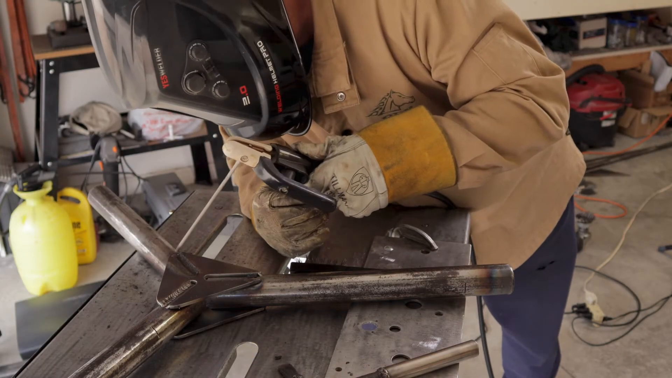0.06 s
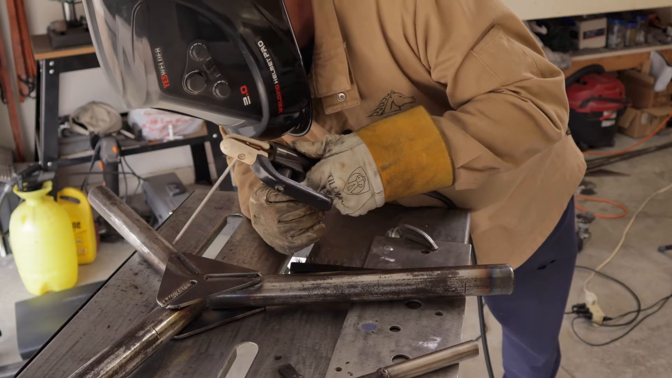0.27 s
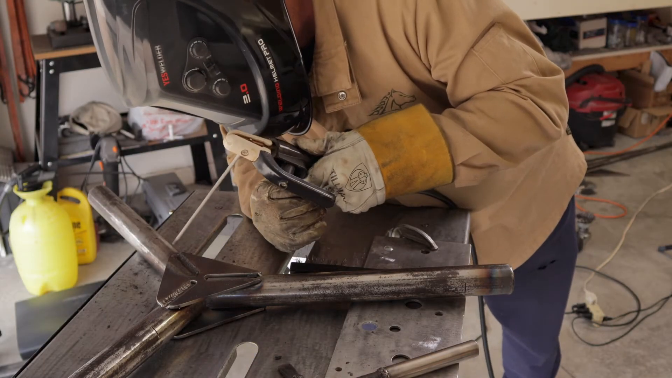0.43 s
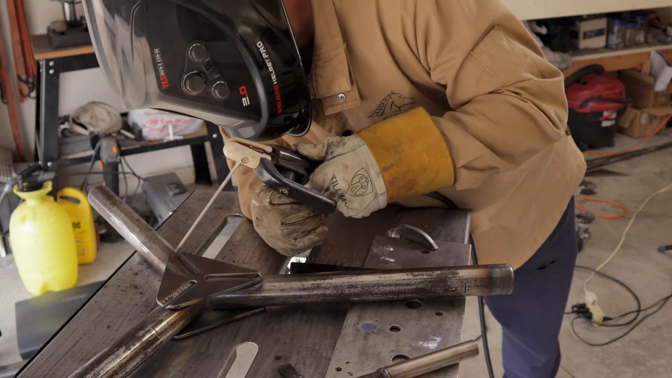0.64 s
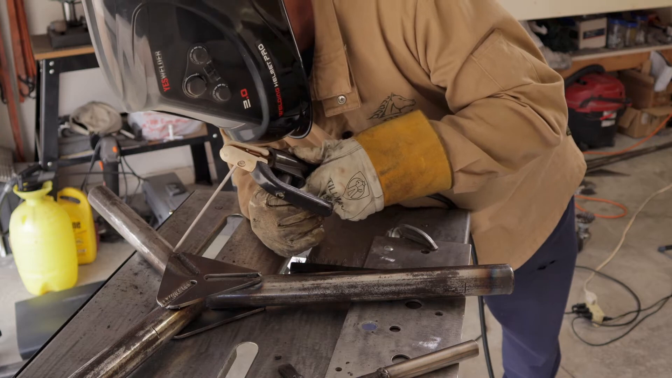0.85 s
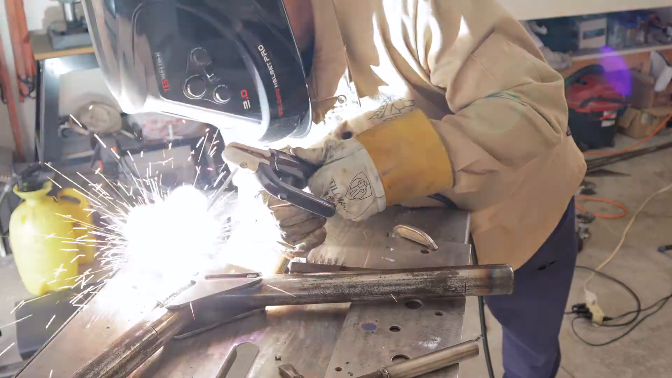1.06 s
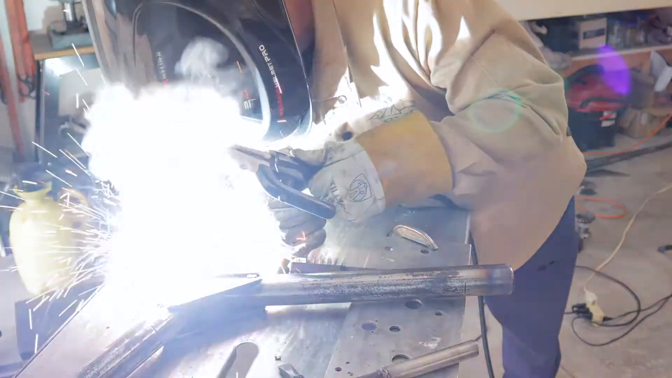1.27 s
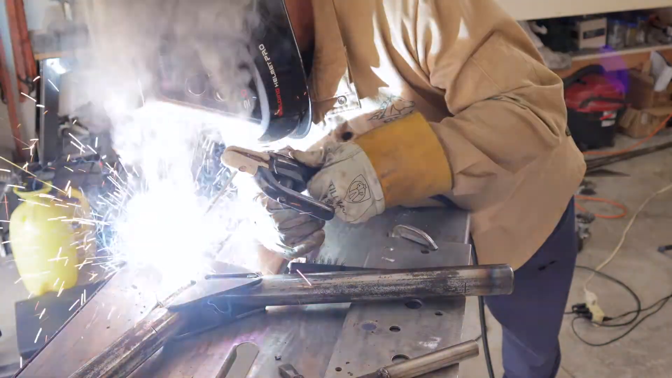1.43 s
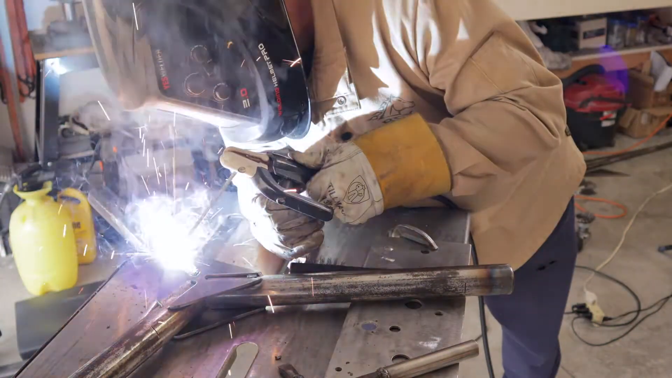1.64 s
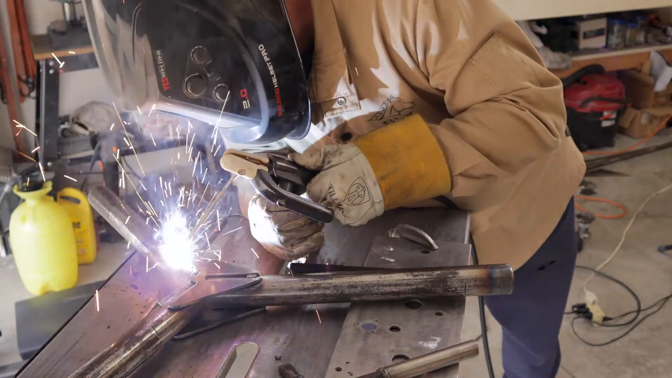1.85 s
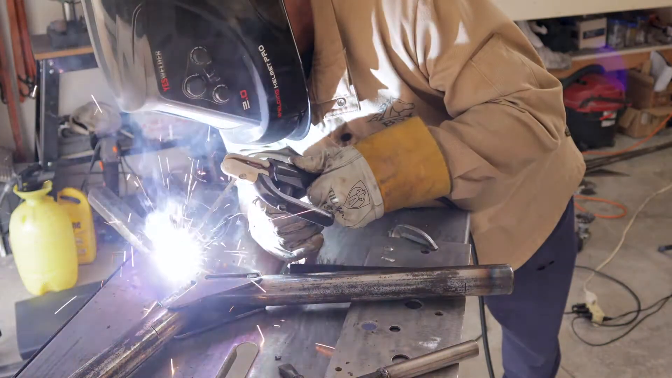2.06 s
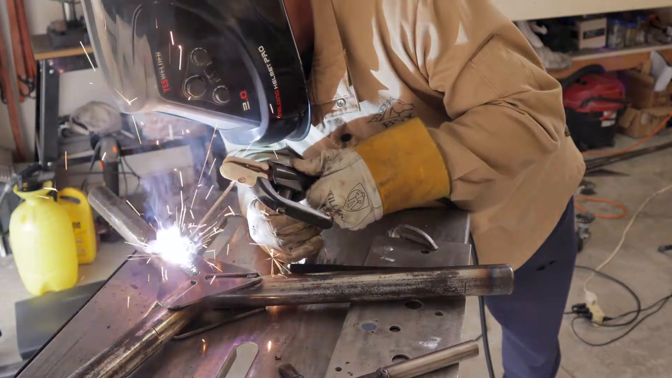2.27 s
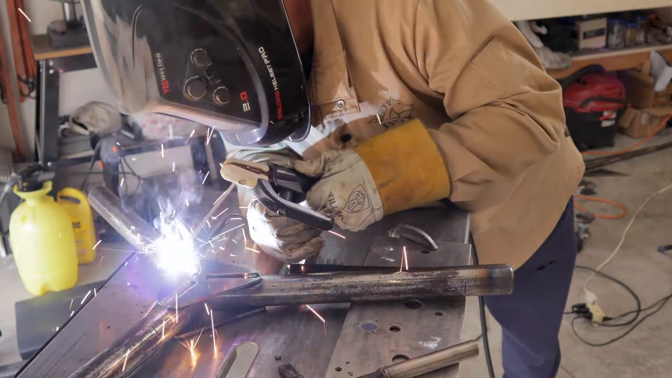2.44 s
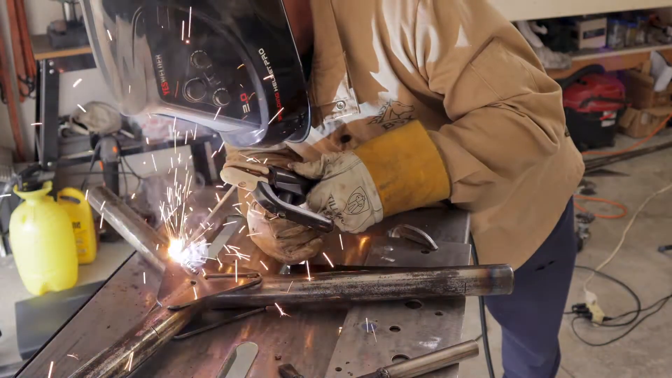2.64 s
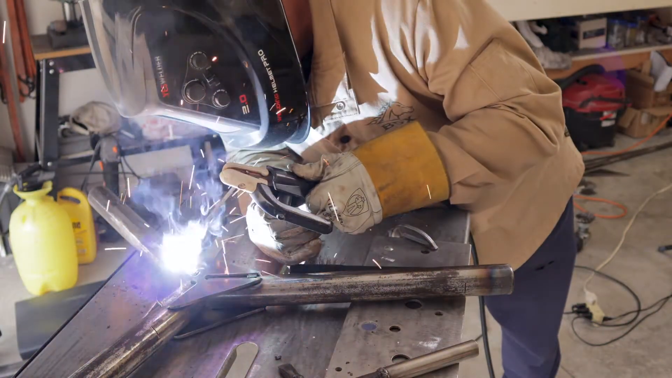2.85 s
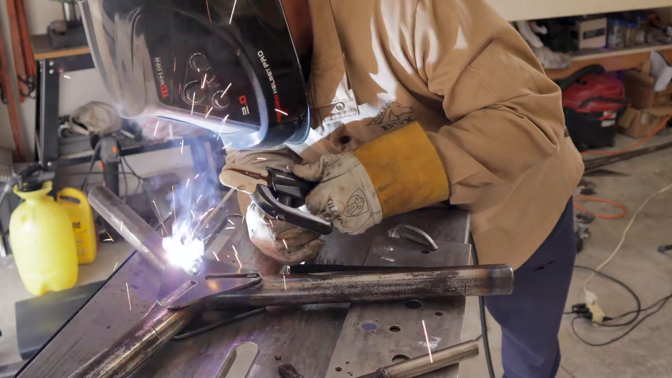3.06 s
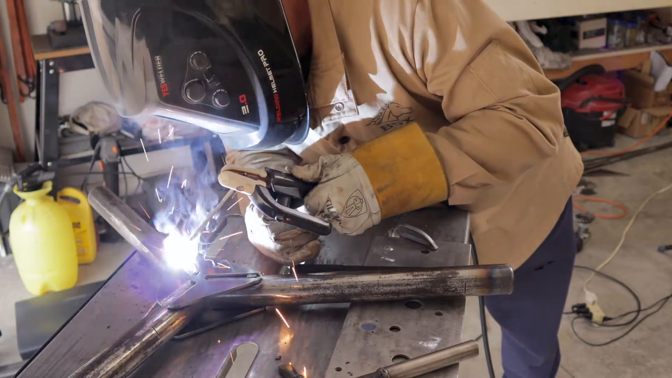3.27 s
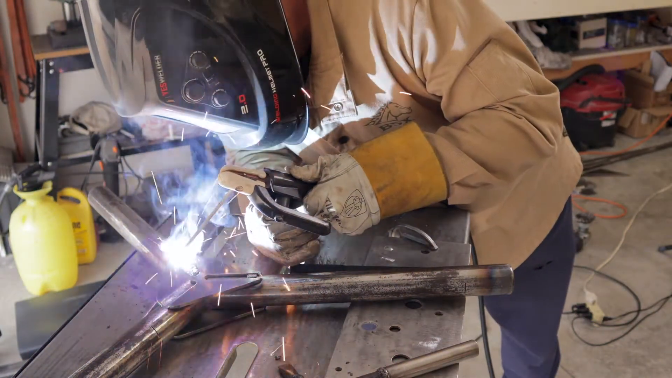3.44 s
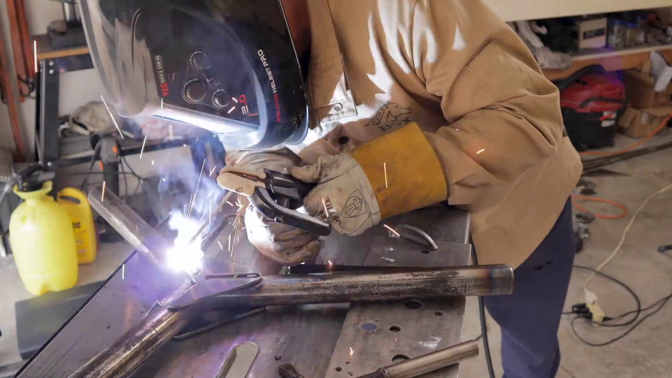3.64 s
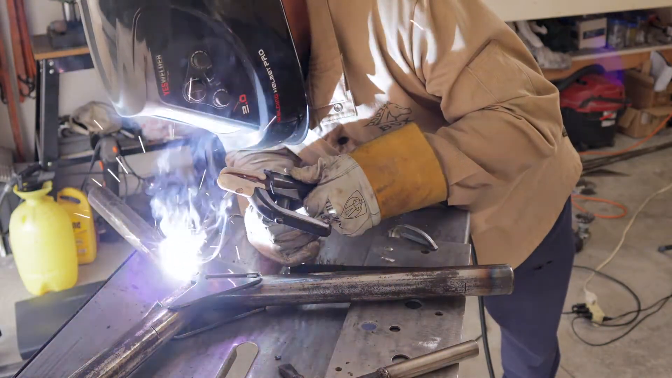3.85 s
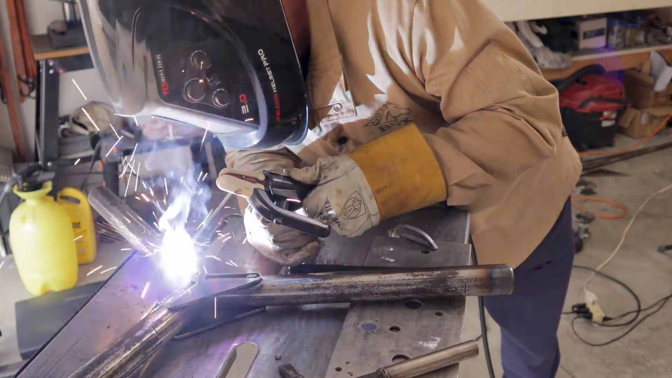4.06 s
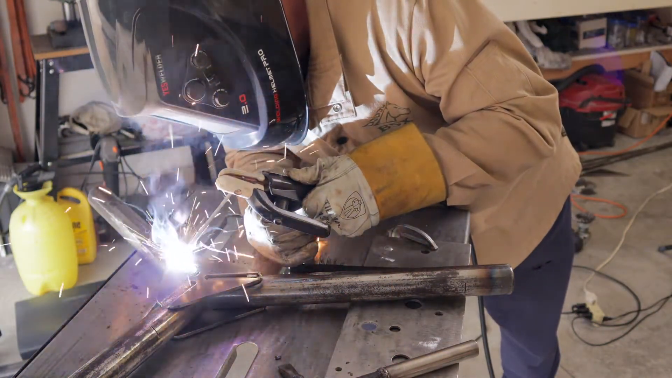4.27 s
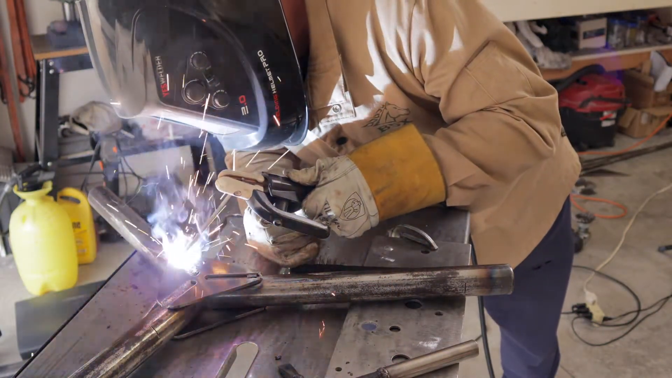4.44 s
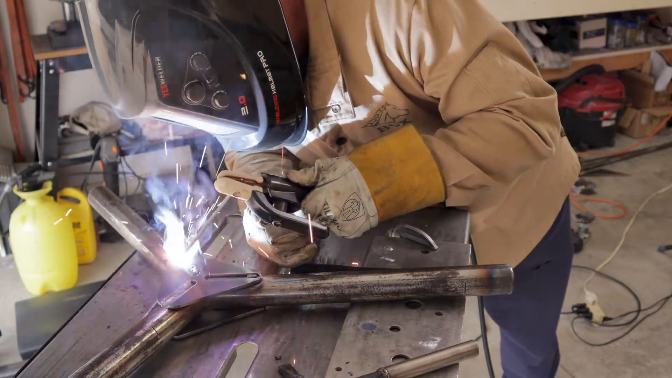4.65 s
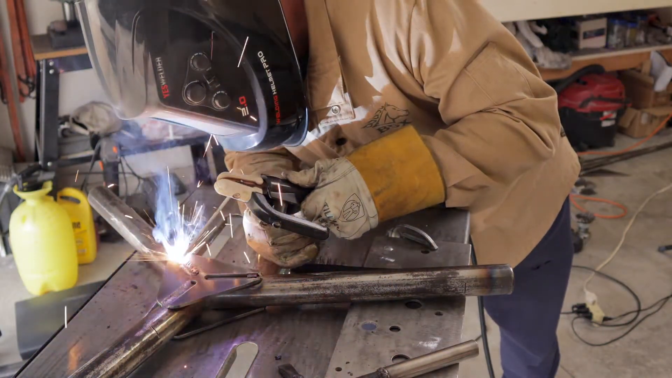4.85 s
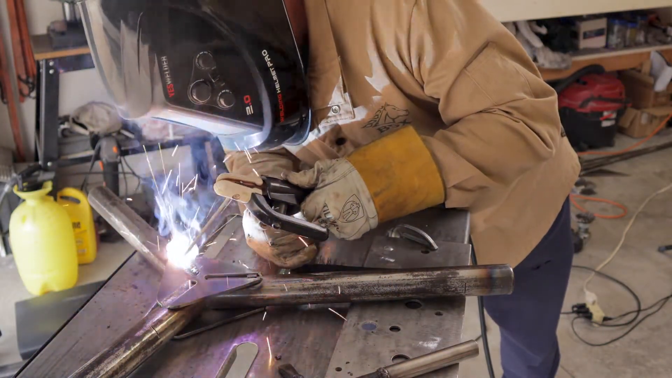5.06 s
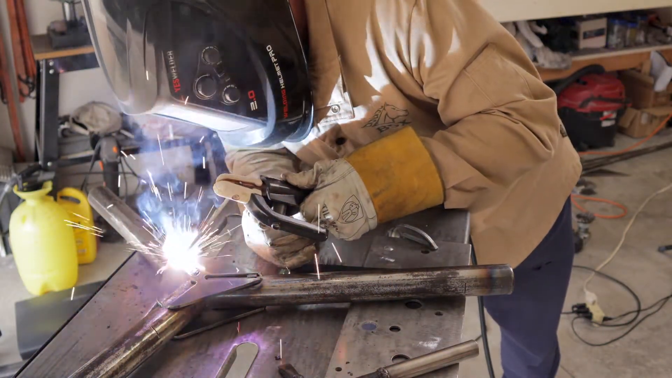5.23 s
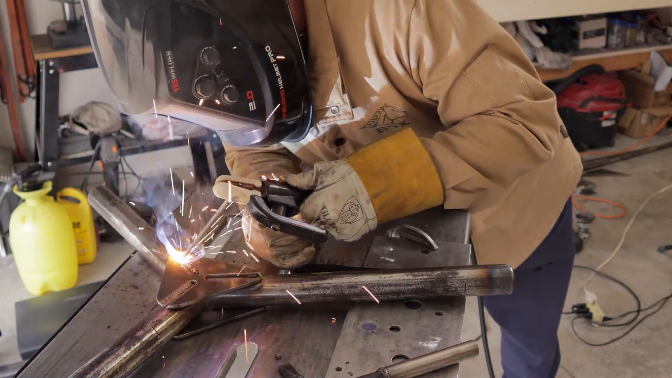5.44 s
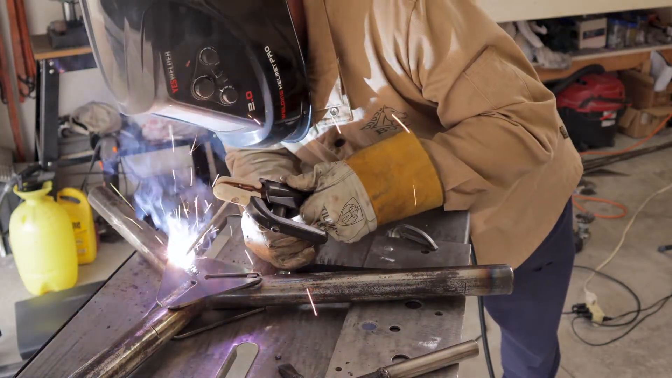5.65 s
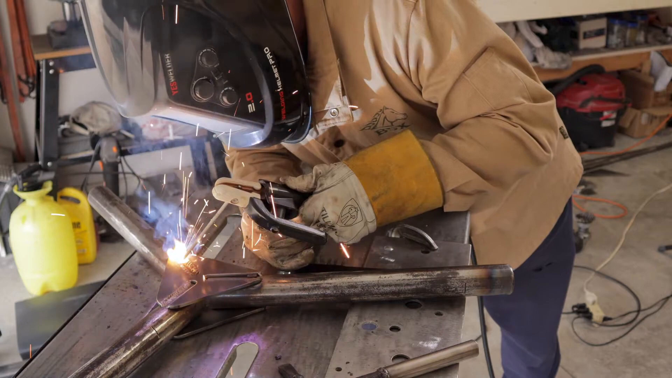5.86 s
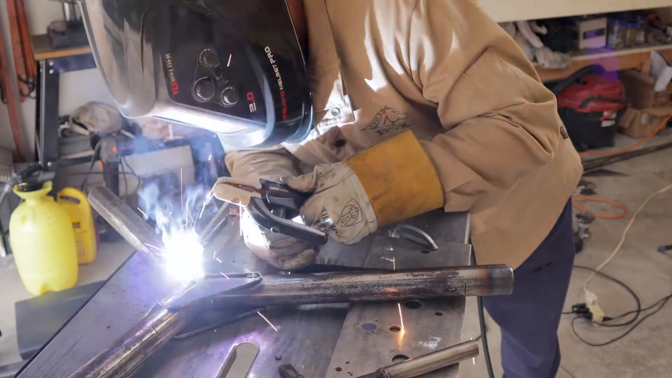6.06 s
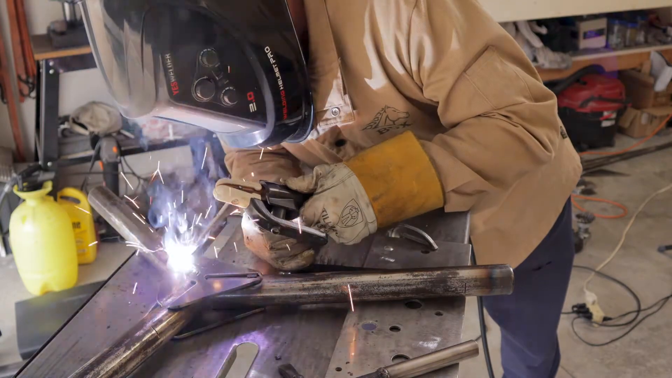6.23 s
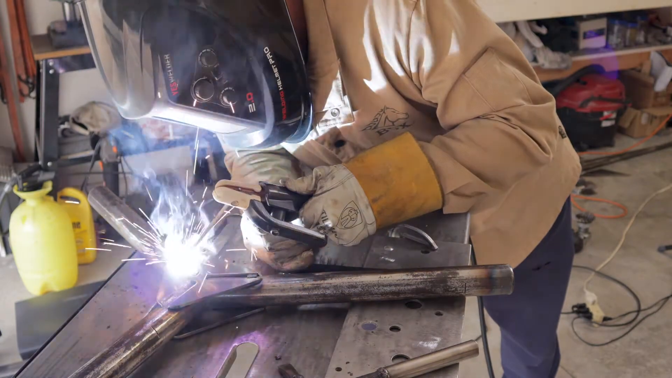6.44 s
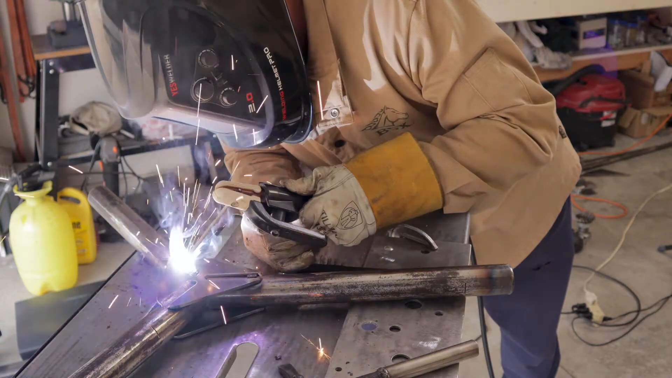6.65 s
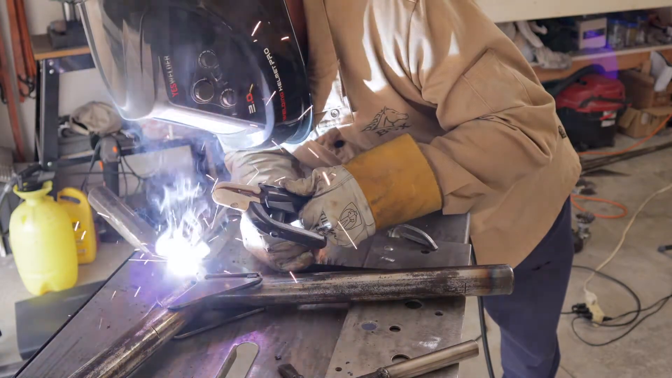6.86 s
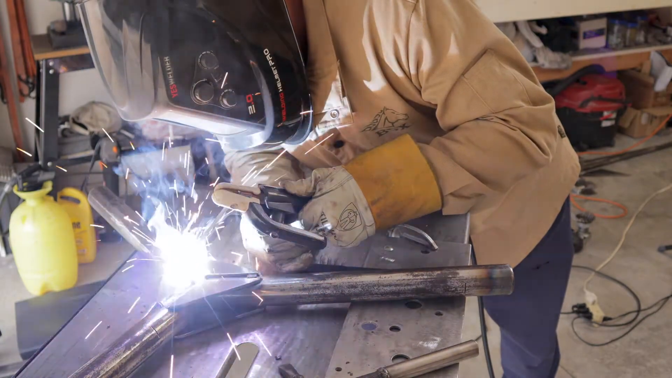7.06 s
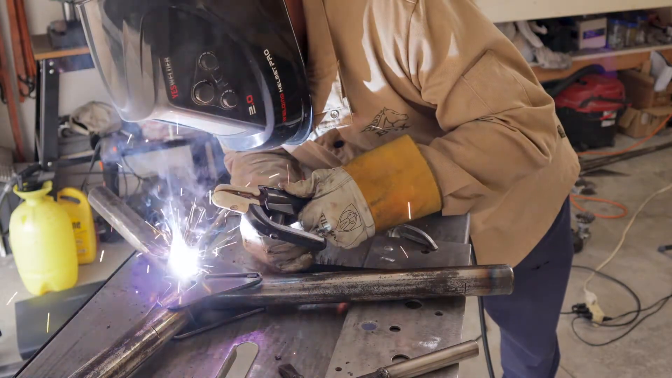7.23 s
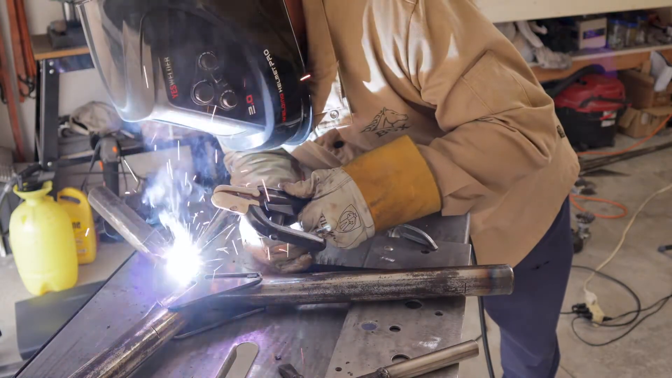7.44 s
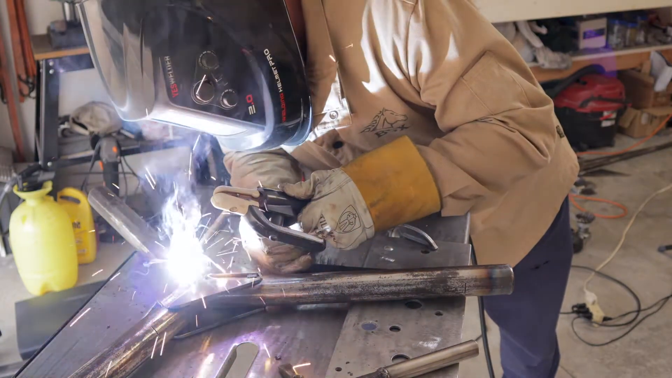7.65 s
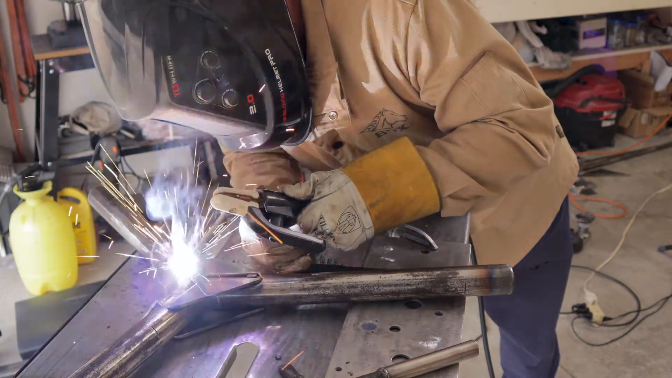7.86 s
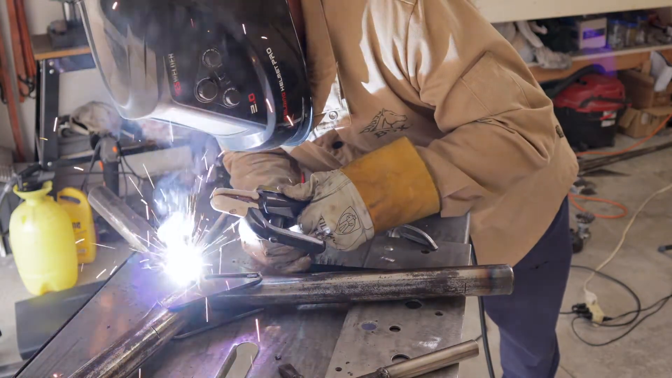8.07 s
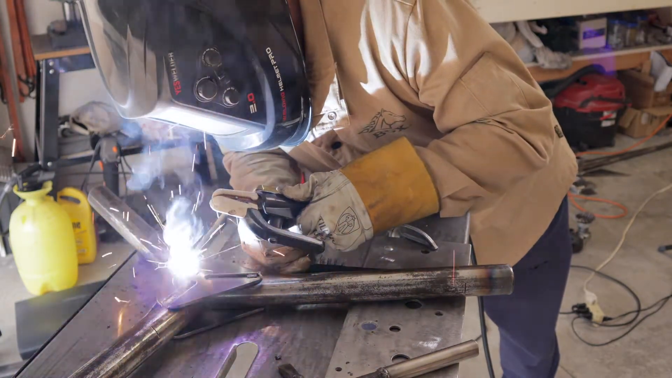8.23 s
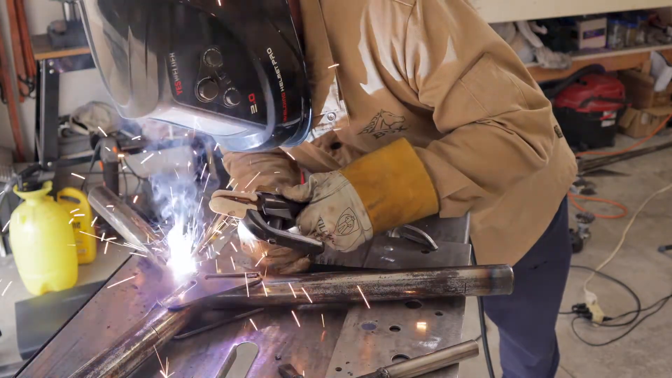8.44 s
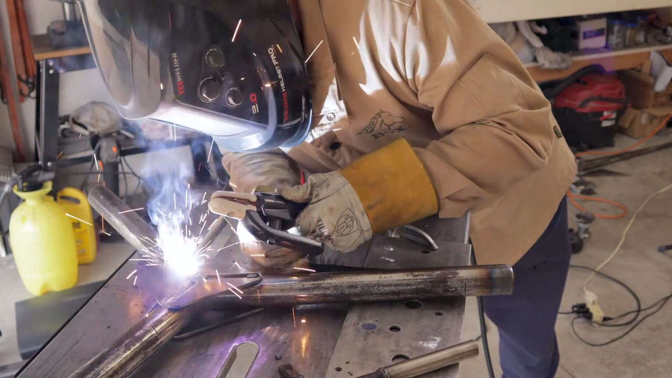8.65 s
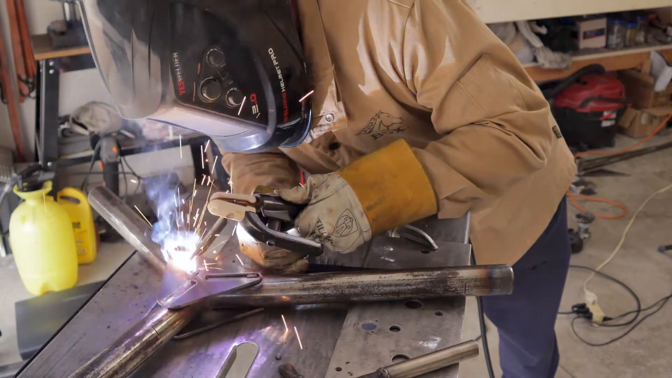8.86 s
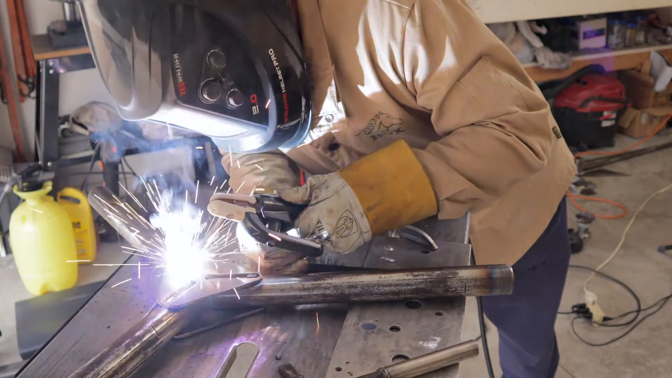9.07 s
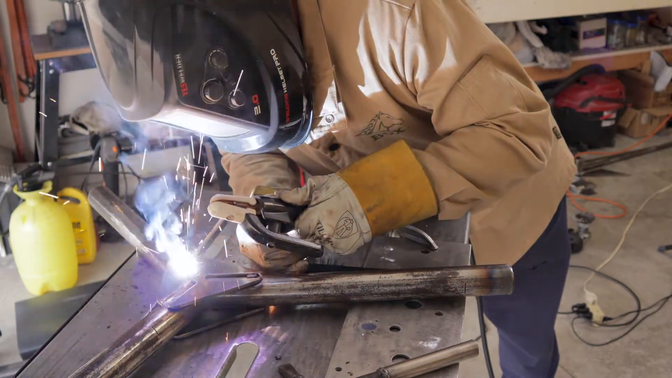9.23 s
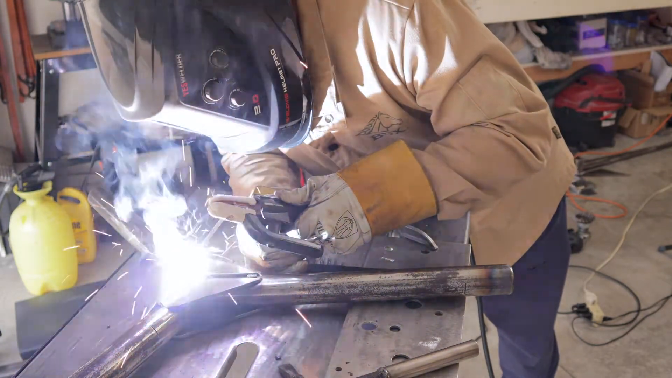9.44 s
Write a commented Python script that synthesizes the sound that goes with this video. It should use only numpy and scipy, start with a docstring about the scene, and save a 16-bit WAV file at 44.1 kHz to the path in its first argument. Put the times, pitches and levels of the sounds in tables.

```python
"""A fan hums and whines as a welding rod scrapes three times over a steel tube in a workshop.
Then the arc flares with a low roar and knocks, and burns on in gusts of sizzle with sharp snaps.
Droplets burst in dull pops and spatter ticks, both stronger at the left of two close microphone ports.
Scrapes and arc are filtered random clicks and hiss, the fan is shaped noise with sine tones,
and the knocks, pops and ticks are short computed swings. Random taps make the room's echo."""
import sys
import numpy as np
from scipy import signal
from scipy.fft import rfft, irfft
from scipy.io import wavfile
from scipy.ndimage import uniform_filter1d

SR = 44100
rng = np.random.default_rng(int(sys.argv[2]) if len(sys.argv) > 2 else 0)


def to_wav(s):
    """Save 16-bit WAV."""
    ch = np.atleast_2d(s).T  # columns
    pcm = np.round(np.clip(ch, -1, 1) * 32767)  # PCM
    wavfile.write(sys.argv[1], SR, pcm.astype(np.int16))


N = 418950
T = np.arange(N) / SR  # time in seconds


def gain_of(db):
    """Turns decibels into a factor."""
    return 10 ** (np.asarray(db) / 20)


def evened(x):
    """Scales a signal to an rms of 1."""
    return x / np.sqrt(np.mean(x ** 2) + 1e-20)


def read(points, hz):
    """Reads a table at any frequency, on a logarithmic scale."""
    f, value = np.transpose(points)
    return np.interp(np.log(hz + 1), np.log(f + 1), value)


def curve(rows, index=1):
    """Draws one column of a table over time and holds its end values."""
    rows = np.array(rows)
    return np.interp(T, rows[:, 0], rows[:, index])


def add(mix, s, sound):
    """Mixes a sound in, starting at s seconds."""
    part = mix[..., max(round(s * SR), 0):][..., :sound.shape[-1]]
    part += sound[..., :part.shape[-1]]


def colour(x, points):
    """Filters a signal with a table of levels over frequency and scales it to rms 1."""
    hz = np.fft.rfftfreq(N, 1 / SR)
    return evened(irfft(rfft(x) * gain_of(read(points, hz)), N))


def drift(seconds):
    """Smooths noise into a random wander of rms 1; longer averaging makes it slower."""
    size = max(round(seconds * SR), 1)
    once = uniform_filter1d(rng.standard_normal(N), size)
    return evened(uniform_filter1d(once, size))


def crackle(per_s, spread_db, hiss_db, clump_db):
    """Tiny discharges of very unequal size come in clumps, over a smoother hiss."""
    size_db = spread_db * np.minimum(rng.exponential(1, N), 3.4)
    size = gain_of(size_db) * rng.choice([-1., 1.], N)
    clicks = evened(size * (rng.random(N) < per_s / SR))
    clumps = np.minimum(drift(0.002), 2)
    hiss = gain_of(hiss_db + 0.16 * clump_db * clumps) * rng.standard_normal(N)
    return clicks * gain_of(clump_db * clumps) + hiss


# How long the room rings. Each row: frequency in Hz, time to fade by 60 dB in seconds.
ROOM_FADE = [(200, 0.51), (1000, 0.15), (4000, 0.089), (12000, 0.026)]


def shop(x, delay_s):
    """The room answers with sparse random taps that differ per port; each band fades at its own speed."""
    spacing, slots = 20, SR // 40
    taps = np.zeros((2, slots * spacing))
    places = np.arange(slots) * spacing + rng.integers(0, spacing, (2, slots))
    np.put_along_axis(taps, places, rng.choice([-1., 1.], (2, slots)), 1)
    hz, t, z = signal.stft(taps, SR, nperseg=256)
    # the walls are metres away, so the echo builds up; the bass gathers last
    build = 1 - np.exp(-(t / delay_s * (hz[:, None] / 1000 + 0.1) ** 0.35) ** 2)
    fade = gain_of(-60 * t / read(ROOM_FADE, hz)[:, None])
    tail = signal.istft(z * build * fade, SR, nperseg=256)[1]
    tail += 1.4 * tail[::-1]  # the two ports share part of the echo
    return signal.fftconvolve(x[None], tail / np.linalg.norm(tail[0]), axes=1)[:, :N]


# Colour of the fan's air noise. Each row: frequency in Hz, relative level in dB.
AIR_COLOUR = [(40, -100), (97, -18.5), (352, -14.5), (432, -6), (473, -15.5), (506, -5.5), (796, -9.5),
              (1050, -6.5), (2020, -8), (2960, -11.5), (3550, -12), (9000, -19), (11700, -64),
              (14000, -110)]
# Ringing of the machine's case. Each row: frequency in Hz, width in Hz, boost in dB.
CASE_RINGS = [(441, 21.5, 7.5), (520, 16.5, 5.5), (1306, 240, 4), (1530, 5.6, 7.5)]
# How alike the air noise is at both ports. Each row: frequency in Hz, likeness from 0 to 1.
LIKENESS = [(100, 1), (700, 0.96), (1500, 0.34), (3000, 0.03), (8000, 0.93)]


def fan_air():
    """The fan's air noise sounds through the ringing case, with patches that swell and fade."""
    frames, hz = N // 512 + 5, np.fft.rfftfreq(2048, 1 / SR)
    a, b, c, d, patches = rng.standard_normal((frames, 1025, 5)).T
    patches = uniform_filter1d(patches, 12, axis=0)
    patches = evened(uniform_filter1d(patches, 8, axis=1))
    rings = 1 + sum((gain_of(db) - 1) / (1 + (2 * (hz - f) / width) ** 2) for f, width, db in CASE_RINGS)
    same = np.clip(read(LIKENESS, hz), 0, 1)[:, None]
    left, other = a + 1j * b, c + 1j * d
    earlier = np.exp(2j * np.pi * hz * 2.7 / SR)[:, None]  # the right port is 2.7 samples nearer
    z = np.array([left, same * left * earlier + np.sqrt(1 - same ** 2) * other])
    z *= rings[:, None] * gain_of(read(AIR_COLOUR, hz)[:, None] + 1.5 * patches)
    return gain_of(-56) * evened(signal.istft(z, nperseg=2048, noverlap=1536)[1][:, :N])


# The blade tone. Each row: time in seconds, level in dB, pitch in Hz before it wavers.
BLADE_TONE = [(0, -73.5, 1137), (1.5, -65.5, 1143), (3.5, -65, 1142), (4.4, -63, 1145), (5.9, -68, 1144),
              (6.6, -65.5, 1141), (9.5, -67.5, 1144)]
# Levels in dB of the blade tone itself and of its multiples, before they waver.
BLADE_MULTIPLES = [0., -5]
# Fainter tones that waver with the blade tone. Each row: pitch in Hz at the blade's first pitch, level in dB.
FAINT_HUMS = [(510, -73), (1265, -71.5)]
# A second tone and its octave. Each row: time in seconds, level in dB of each before it wavers.
SECOND_TONE = [(0, -72.5), (1.7, -71), (4.5, -78), (7, -72), (9.5, -72)]


def fan_tones():
    """The whine is a wavering sine with a multiple; fainter machine tones lie beside it."""
    turns = np.cumsum(curve(BLADE_TONE, index=2) + 1.35 * drift(0.15)) / SR
    whine = sum(gain_of(db + 2.06 * drift(0.03)) * np.sin(2 * np.pi * k * turns)
                for k, db in enumerate(BLADE_MULTIPLES, 1))
    first_hz = BLADE_TONE[0][2]
    hums = sum(gain_of(db) * np.sin(2 * np.pi * turns * f / first_hz) for f, db in FAINT_HUMS)
    hums *= gain_of(0.89 * drift(0.088))
    angle = 2 * np.pi * np.cumsum(981.5 + 2.5 * drift(0.15)) / SR  # second tone, centred on 981.5 Hz
    second = gain_of(curve(SECOND_TONE) + 1.4 * drift(0.12)) * (np.sin(angle) + np.sin(2 * angle))
    return np.sqrt(2) * (gain_of(curve(BLADE_TONE)) * whine + hums + second)


def fan():
    """The welding machine's fan gives air noise plus steady tones."""
    return fan_air() + fan_tones()


# The rod's tip touches down. Each row: time in seconds, peak in dB before the ports.
TOUCHES_OF_TIP = [(0.0272, -31.5), (0.1636, -31), (0.94, -37)]


def touches():
    """The tip rings briefly, close and dry: a 7830 Hz sine that swells and fades within milliseconds."""
    out, t = np.zeros(N), np.arange(-130, 200) / SR
    ring = np.sin(2 * np.pi * 7830 * t) * np.exp(-(t / 0.0024) ** 2)
    for s, db in TOUCHES_OF_TIP:
        add(out, s + t[0], gain_of(db) * ring)
    return out


# Strokes of the rod over the steel. Each row: loudest moment in seconds, level in dB before the ports,
# rise in dB per second, fall in dB per second.
STROKES = [(0.043, -44, 500, 420), (.197, -44.5, 250, 330), (0.338, -35, 750, 520)]
# Colour of the scraping. Each row: frequency in Hz, relative level in dB.
SCRAPE_COLOUR = [(1470, -55), (2500, -29), (4240, -10), (5520, 1), (6920, -7), (7710, 1), (9360, -17),
                 (11200, -7), (16000, -17)]
STROKE_S = 0.03  # seconds from the start of a stroke to its loudest moment


def rod():
    """Gritty friction crackles under each stroke of the rod."""
    level = np.zeros(N)
    for s, db, rise, fall in STROKES:
        drop_db = np.where(T < s, rise * (s - T), fall * (T - s))
        level += gain_of(db - drop_db) * (T > s - STROKE_S)
    return level * colour(crackle(per_s=6000, spread_db=3.5, hiss_db=0., clump_db=2.6), SCRAPE_COLOUR)


# Spatter hitting the microphone's housing. Each row: time in seconds, strength in dB,
# pitch in Hz before it is raised by 1.15, left over right in dB.
SPATTER_TICKS = [(1.7807, -24.5, 2800, 21), (2.1462, -25.5, 2360, 20), (3.4934, -25.5, 3160, 24),
                 (3.5680, -27, 3120, 8), (4.3198, -24, 3100, 13), (5.2888, -21.5, 3180, 21),
                 (6.4144, -25, 2500, 18), (6.8180, -22.5, 2750, 23), (7.3642, -25.5, 2700, 19),
                 (7.7710, -31, 2500, 27), (7.9378, -25, 2660, 15), (8.1681, -26, 2700, 15),
                 (8.5135, -32, 2000, 9), (8.9747, -22.5, 3020, 13), (9.4558, -18, 3120, 27)]
RATTLE_DB, RATTLE_S = -12, 0.002  # strength and fading time of the housing's rattle


def spatter():
    """Each tick is one sharp swing of the housing and a short rattle, mostly in the left port."""
    out, t = np.zeros((2, N)), np.arange(-30, 400) / SR
    noise = rng.standard_normal((len(SPATTER_TICKS), len(t))) * np.exp(-abs(t) / RATTLE_S) * (t > 0)
    noise = signal.lfilter(*signal.butter(2, (900, 9000), "band", fs=SR), noise)
    for (s, db, hz, lean_db), rattle in zip(SPATTER_TICKS, noise):
        u = 2 * np.pi * hz * t - 1
        swing = 1.2 * np.sin(-1.15 * u) * np.exp(-(u / np.where(u < 0, 2.8, 4.2)) ** 2)
        tick = swing + gain_of(RATTLE_DB) * rattle
        add(out, s + t[0], gain_of([[db], [db - lean_db]]) * tick * [[1], [-1]])
    return out


# The sputtering first arc knocks on the tube. Each row: time in seconds, strength in dB.
TUBE_KNOCKS = [(1.072, -26.5), (1.082, -36), (1.095, -24.5), (1.119, -37), (1.209, -26), (1.27, -28),
               (1.296, -30)]
# The tube's two low modes. Each row: frequency in Hz before a random shift per knock, level in dB.
TUBE_MODES = [(1440, -6.5), (2350, -12.5)]
KNOCK_S = 0.0018  # fading time; the rise takes half of it


def knocks():
    """Each knock is a few swings of the tube's two low modes."""
    out, t = np.zeros(N), np.arange(-200, 400) / SR
    shape = np.exp(-abs(t / np.where(t < 0, KNOCK_S / 2, KNOCK_S)) ** 2.0)
    for (s, db), (pitch, phase) in zip(TUBE_KNOCKS, rng.random((len(TUBE_KNOCKS), 2))):
        shift = 0.99 + 0.12 * pitch
        ring = sum(gain_of(mode_db) * np.cos(2 * np.pi * (hz * shift * t + k * phase))
                   for k, (hz, mode_db) in enumerate(TUBE_MODES))
        add(out, s + t[0], gain_of(db) * ring * shape)
    return out


# Bursting droplets. Each row: time in seconds, peak in dB at the left port, rise in ms, length in ms,
# suck against push, sign and size (plus for push first, minus for suck first), left over right in dB,
# rumble strength in dB, rumble length in ms.
DROPLETS = [(1.3962, -9.5, 0.012, 0.27, 1.97, 0.86, 12, -48, 22),
            (2.1248, -25, 0.042, 0.12, 1.2, 1, 14, -52.5, 47),
            (3.0620, -23.5, 0.036, 0.19, 0.99, 1, 13, -51.5, 62),
            (8.2361, -15.5, 0.036, 0.06, 1.02, 0.92, 10, -60, 8),
            (8.2417, -21, 0.024, 0.13, 2.9, 0.55, 15, -52.5, 23),
            (8.4713, 0.7, 0.061, 0.35, 1.62, 0.94, 24, -54, 64),
            (8.5600, -27, 0.078, 0.41, 2, -0.95, 20, -58, 14)]
RUMBLE_HZ = (340, 910, 2200)  # the dull part lies between the first two, the bright part above it
RUMBLE_RISE_MS, RUMBLE_FALL_MS = 2.4, 10
RUMBLE_BRIGHT_DB = 5  # starting strength of the bright part


def pops():
    """A droplet's blast pushes and sucks, swings on through a low cut, and a lumpy rumble darkens."""
    near, ms = np.zeros((2, N)), np.arange(1300) / SR * 1000
    # the microphone capsule's low cut at 130 Hz, passed twice
    cut = np.vstack([signal.butter(2, 130, "high", fs=SR, output="sos")] * 2)
    after = np.arange(SR // 5) / SR * 1000  # ms since the burst
    noise = rng.standard_normal((len(DROPLETS), 3, len(after)))
    lumps = gain_of(2.2 * drift(0.003))
    for (s, db, rise, length, suck, sign, lean_db, rumble_db, hold), (a, b, c) in zip(DROPLETS, noise):
        blast = (1 - suck * ms / length) * np.exp(-ms / length)
        softener = np.exp(-0.5 * ((ms[:44] - 0.5) / rise) ** 2)
        blast = signal.sosfilt(cut, np.convolve(softener, blast)[:len(ms)])
        start = s - np.argmax(blast[:44]) / SR
        blast *= sign * gain_of(db) / blast[:44].max()
        far = -gain_of(-lean_db) * np.roll(blast, 3)  # the far port sees the suck, 3 samples later
        add(near, start, np.array([blast, far]))
        pair = np.array([a + 1.3 * c, b + 0.88 * c])  # c is common to both ports
        dull, bright = (evened(signal.lfilter(*signal.butter(2 - k, RUMBLE_HZ[k:k + 2], "band", fs=SR), pair))
                        for k in range(2))
        shape = 1 - np.exp(-(after / RUMBLE_RISE_MS) ** 2)
        shape *= np.exp(-np.maximum(after - hold, 0) / RUMBLE_FALL_MS)
        rumble = np.tanh(0.24 + 2 * after / hold) * dull
        rumble += gain_of(RUMBLE_BRIGHT_DB) * np.exp(-after / hold) * bright
        add(near, s, gain_of(rumble_db) * shape * rumble * lumps[round(s * SR):][:len(after)])
    return near


# Steady burn. Each row: time in seconds, sizzle level in dB before the ports,
# share of the treble above 10 kHz in dB.
STEADY_BURN = [(.945, -51.5, 1), (.968, -42, -4), (1.1, -39.5, -3), (1.32, -37.5, -5.5), (1.39, -44.5, -3),
               (1.5, -51.5, -1.5), (1.85, -54.5, -1), (2.1, -53.5, -4), (2.55, -63.5, -5.5),
               (2.93, -59.5, -6), (3.4, -61.5, -1.5), (3.85, -55.5, -4.5), (4.7, -59, -2.5), (5.8, -59, -2),
               (5.95, -63, -3), (6.3, -50, -1), (6.75, -51, -1.5), (7.3, -56, -3), (8.0, -53.5, -5),
               (8.55, -64, -2.5), (9.5, -52.5, -4)]
# Spurts of the arc. Each row: peak time in seconds, level in dB before the ports, length in seconds.
ARC_SPURTS = [(1.422, -36, 0.051), (1.531, -38, 0.026), (2.127, -48, 0.051), (2.259, -49, 0.019),
              (2.392, -42.5, 0.066), (2.5, -43.5, 0.0091), (2.546, -51, 0.13), (3.21, -52.5, 0.12),
              (3.52, -54.5, 0.054), (3.76, -48.5, 0.079), (4.008, -47.5, 0.036), (4.94, -53, 0.32),
              (5.297, -51.5, 0.089), (5.653, -47.5, 0.016), (5.775, -49, 0.029), (6.161, -44, 0.073),
              (6.343, -43, 0.017), (6.723, -49, 0.021), (6.84, -49, 0.026), (7.076, -46.5, 0.027),
              (7.18, -48, 0.073), (7.857, -54, 0.027), (8.236, -53, 0.17), (8.398, -48.5, 0.11),
              (8.684, -54, 0.33), (8.974, -49, 0.044), (9.086, -49, 0.071), (9.44, -57, 0.083)]
SPURT_EDGE_DB = 7.5  # drop at both ends of a spurt's length
FIZZ_DB, FIZZ_S = -31, 0.025  # fizz against its snap, and its fading time


def burn():
    """The sizzle's level adds steady burn, spurts and the fizz after each snap as powers."""
    power, t = gain_of(2 * curve(STEADY_BURN)), np.arange(-SR // 5, SR // 5) / SR
    for s, db, length in ARC_SPURTS:
        add(power, s + t[0], gain_of(2 * (db - SPURT_EDGE_DB * abs(2 * t / length))))
    for s, db in ARC_SNAPS:
        add(power, s, gain_of(2 * (db + FIZZ_DB)) * np.exp(-2 * t[t >= 0] / FIZZ_S))
    return np.sqrt(power) * (T > STEADY_BURN[0][0])


# Colour of the sizzle and the snaps. Each row: frequency in Hz, relative level in dB.
SIZZLE_COLOUR = [(1760, -38), (3000, -11.5), (3650, -12), (6480, -3.5), (8460, 1.5), (9730, -2), (10900, 8),
                 (11800, -1), (13100, 6), (16000, 1)]


def sizzle():
    """The arc's crackle is split at 10 kHz, and the two halves are mixed in changing shares."""
    level = burn()
    # the strong arc burns too densely for single clicks, so hiss takes over
    hiss_db = np.clip((20 * np.log10(level + 1e-9) + 50) / 2, -6, 3)
    whole = colour(crackle(per_s=550, spread_db=4., hiss_db=hiss_db, clump_db=4.2), SIZZLE_COLOUR)
    low = signal.oaconvolve(whole, signal.firwin(101, 10000, fs=SR), "same")
    top = np.clip(gain_of(curve(STEADY_BURN, index=2)), 0, 0.97)
    return level * (np.sqrt(1 - top ** 2) * evened(low) + top * evened(whole - low))


# The long first arc. Each row: time in seconds, level in dB before it sputters.
FIRST_FLARE = [(.95, -68), (1.0, -45.5), (1.08, -40.5), (1.17, -44), (1.28, -43), (1.38, -50),
               (1.42, -49.5), (1.62, -65)]
# Colour of its roar. Each row: frequency in Hz, relative level in dB.
ROAR_COLOUR = [(200, -51), (329, -20), (628, -16), (739, -13), (1090, -16), (1350, -1.5), (1730, -13),
               (2060, -3), (3300, -11.5), (5000, -8), (6500, -1), (11000, -120)]


def roar():
    """The first arc roars lower and rings the tubes: crackle with a sputtering level."""
    sound = colour(crackle(per_s=450, spread_db=4., hiss_db=-5., clump_db=3.5), ROAR_COLOUR)
    sound *= gain_of(2.4 * drift(0.008))
    return gain_of(curve(FIRST_FLARE)) * sound * (T > FIRST_FLARE[0][0]) * (T < FIRST_FLARE[-1][0])


# Sharp snaps of the arc. Each row: time in seconds, strength in dB.
ARC_SNAPS = [(1.1522, -21), (1.1564, -22), (1.1635, -22), (1.2096, -23), (1.2486, -14), (1.2752, -23),
             (1.3173, -20), (1.4012, -26), (1.4127, -21), (1.4167, -18), (1.4185, -21), (1.4427, -25),
             (1.5229, -23), (1.57, -30), (1.7385, -31), (2.0225, -29), (2.1177, -29), (2.1464, -19),
             (2.1601, -28), (2.3923, -27), (2.408, -24), (2.428, -27), (2.494, -29), (3.74, -28),
             (4.0437, -31), (4.9205, -25), (6.1275, -26), (6.1798, -24), (6.4775, -32), (6.5131, -21),
             (6.5342, -29), (6.6229, -29), (6.678, -30), (6.695, -31), (6.7099, -27), (6.7886, -27),
             (6.8057, -27), (7.137, -23), (7.1762, -28), (7.2037, -29), (7.4937, -31), (7.6033, -24),
             (7.8776, -28), (8.384, -27), (8.9568, -30), (9.0163, -29), (9.0784, -29), (9.1078, -28),
             (9.1316, -26), (9.4445, -29)]


def snaps():
    """Each snap is one slightly blunt discharge in the sizzle's colour, with a spit of noise."""
    out, t = np.zeros(N), np.arange(-32, 130) / SR
    hz = np.fft.rfftfreq(len(t), 1 / SR)
    crack = np.roll(irfft(gain_of(read(SIZZLE_COLOUR, hz)), len(t)), 32)
    crack = crack + 0.75 * np.roll(crack, 1)  # blunts it
    for (s, db), noise in zip(ARC_SNAPS, rng.standard_normal((len(ARC_SNAPS), len(t)))):
        spit = 0.092 * np.diff(noise, prepend=0) * np.exp(-abs(t) / 0.00028)
        add(out, s + t[0], gain_of(db) * (-2.2 * crack / crack.max() + spit))
    return out


def arc():
    """The burning arc sizzles, roars at the strike and snaps."""
    return sizzle() + roar() + snaps()


# Phase between the ports. Each row: frequency in Hz, radians by which the left leads.
PORT_PHASE = [(3300, -1), (5000, -2), (10000, -2), (16000, -12.5)]
LEAN_DB_PER_S = 0.0861  # the weld creeps towards the left port


def ports(x):
    """The housing turns the right port's treble phase; the flickering arc adds a part of its own there."""
    right = irfft(rfft(x) * np.exp(-1j * read(PORT_PHASE, np.fft.rfftfreq(N, 1 / SR))), N)
    hz, t, z = signal.stft(x, SR, nperseg=64)
    own = z * np.exp(2j * np.pi * rng.random(z.shape)) * (hz / (hz + 2000))[:, None]
    own = signal.istft(own, SR, nperseg=64)[1][:N]
    left = gain_of(2.0 + LEAN_DB_PER_S * T) * x
    return np.array([left, gain_of(-3.5) * right + gain_of(3.0) * own])


def scene():
    """Brings the fan, the room and all the welding sounds together at the two ports."""
    weld, ticks, blows = rod() + arc(), spatter(), knocks()
    into_room = weld + gain_of(-5.) * blows + gain_of(-11.) * ticks[0]
    room = gain_of(-5.) * shop(into_room, delay_s=0.002)
    return ports(weld + blows + touches()) + room + pops() + ticks + fan()


def record(dry):
    """Takes away the treble above about 16.1 kHz with a steep low-pass filter."""
    low_pass = signal.firwin(511, 16100, window=("kaiser", 9), fs=SR)
    return signal.oaconvolve(dry, low_pass[None], "same")


dry = scene()
out = record(dry)
to_wav(out)
```